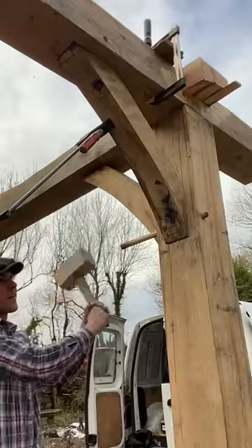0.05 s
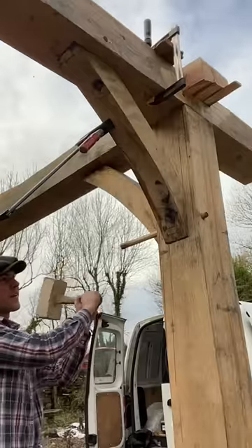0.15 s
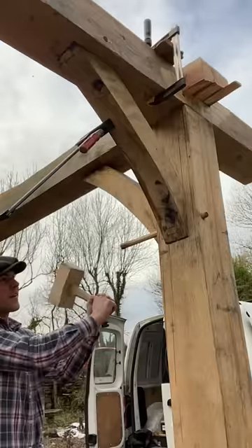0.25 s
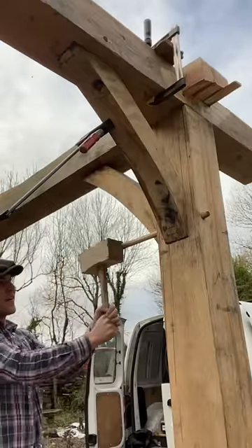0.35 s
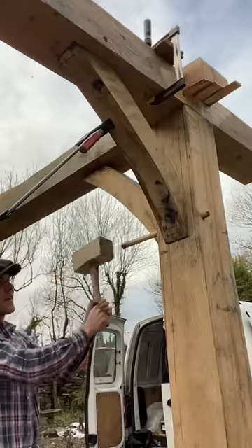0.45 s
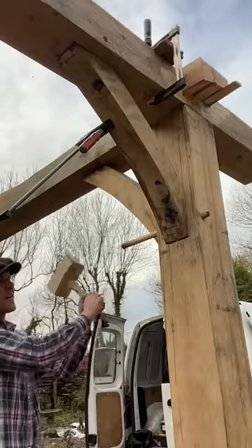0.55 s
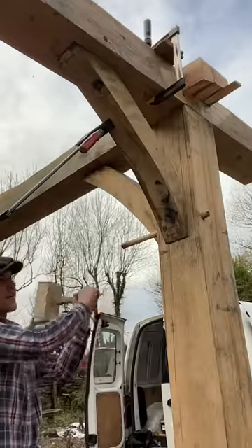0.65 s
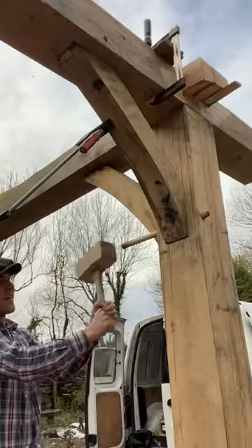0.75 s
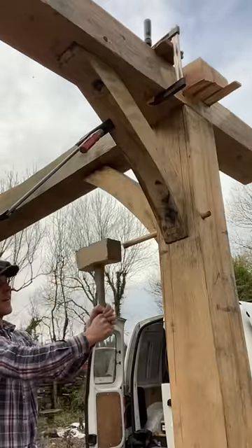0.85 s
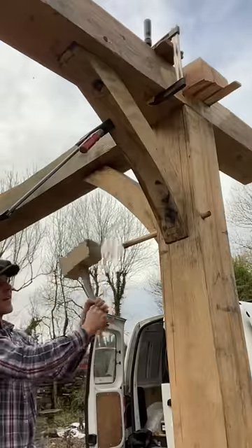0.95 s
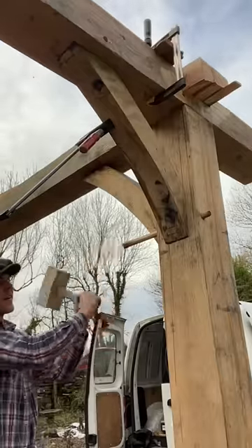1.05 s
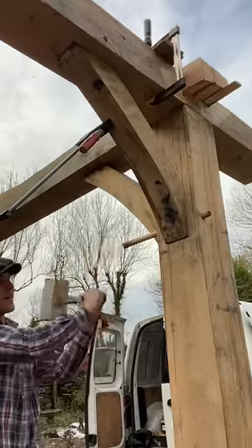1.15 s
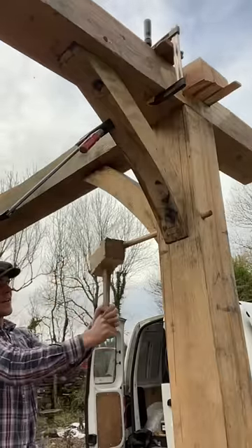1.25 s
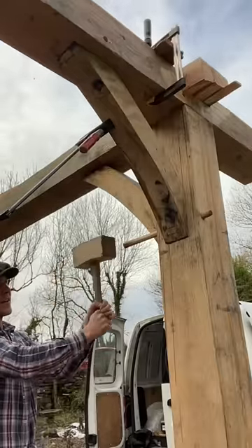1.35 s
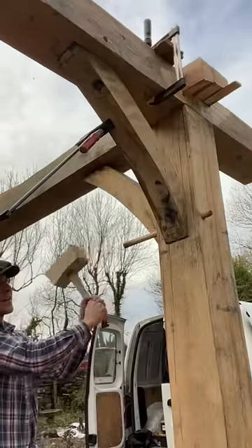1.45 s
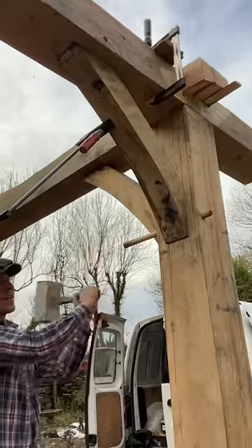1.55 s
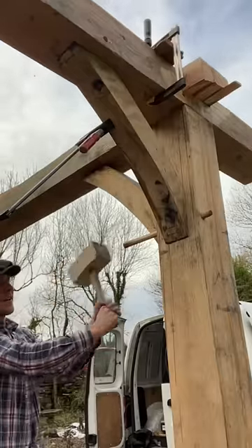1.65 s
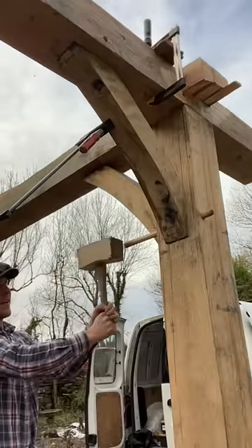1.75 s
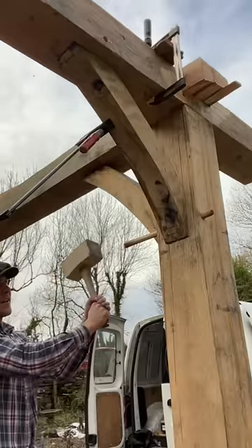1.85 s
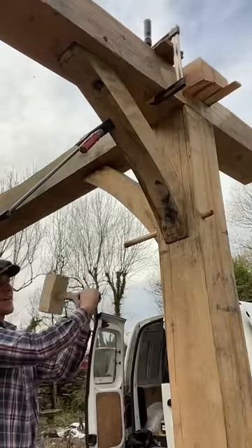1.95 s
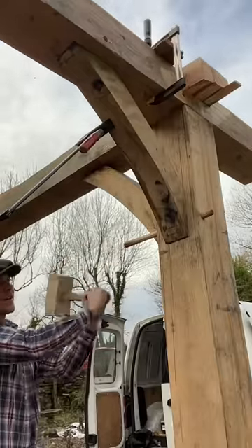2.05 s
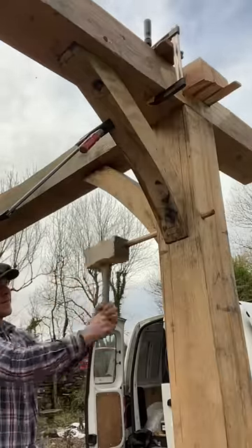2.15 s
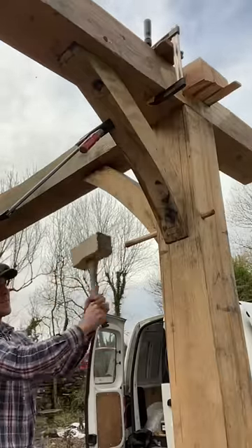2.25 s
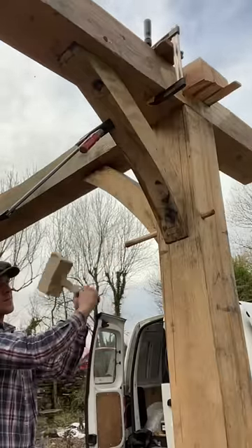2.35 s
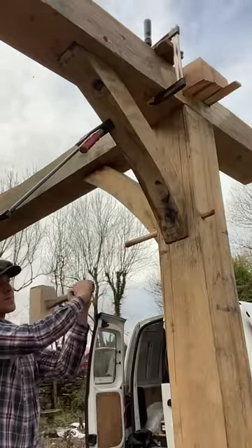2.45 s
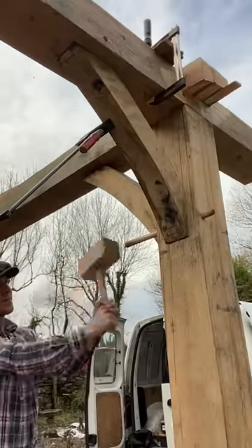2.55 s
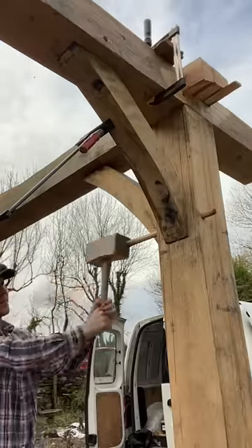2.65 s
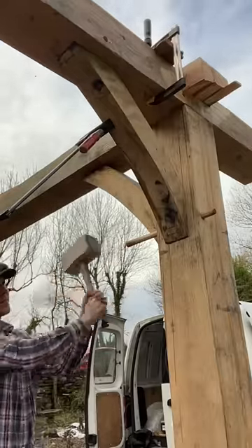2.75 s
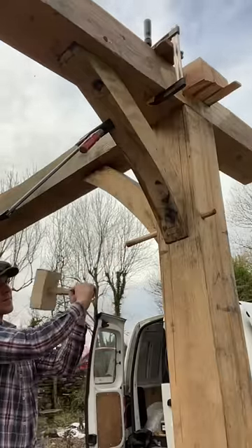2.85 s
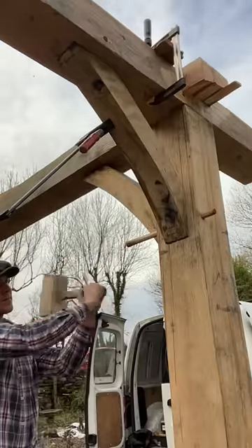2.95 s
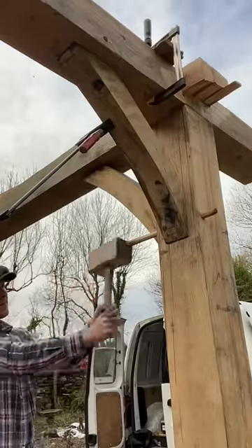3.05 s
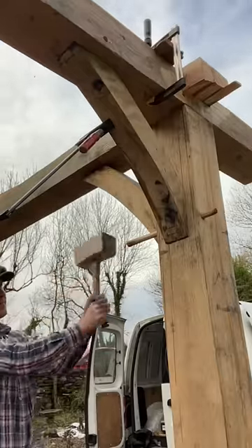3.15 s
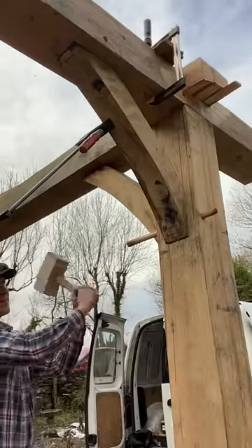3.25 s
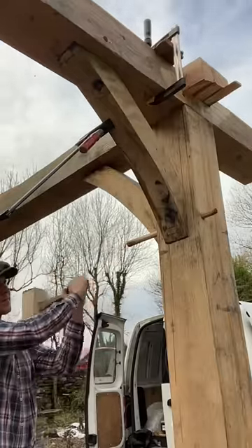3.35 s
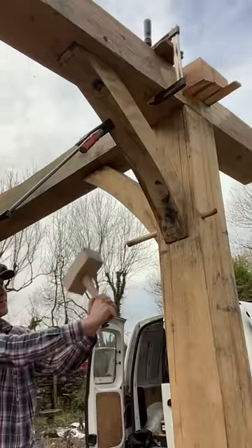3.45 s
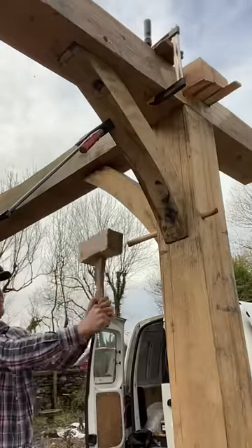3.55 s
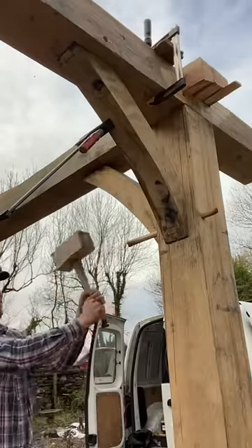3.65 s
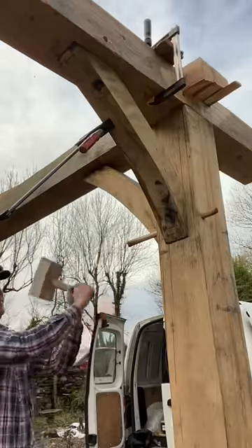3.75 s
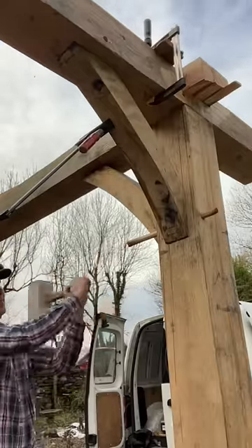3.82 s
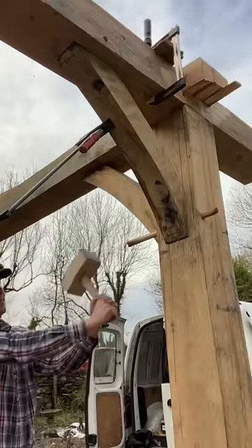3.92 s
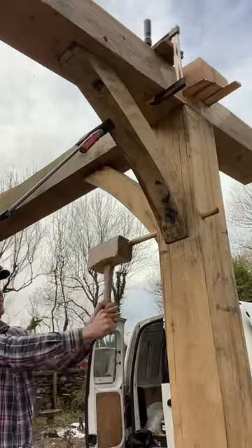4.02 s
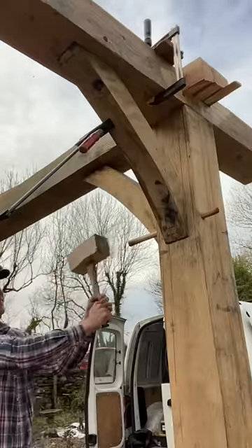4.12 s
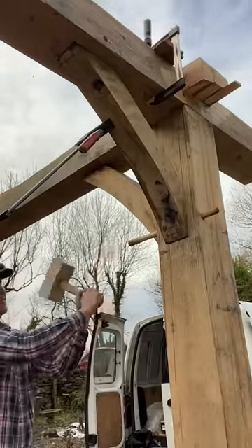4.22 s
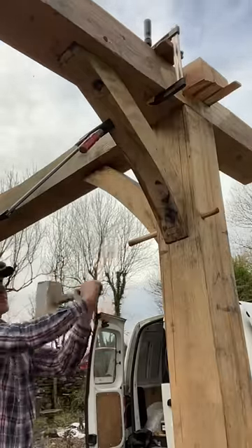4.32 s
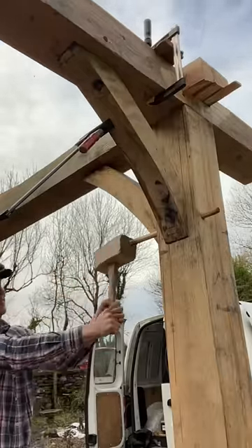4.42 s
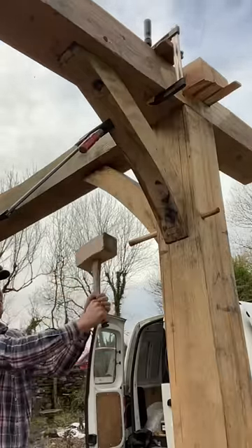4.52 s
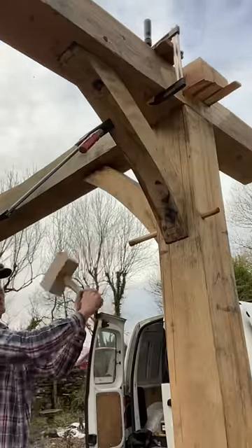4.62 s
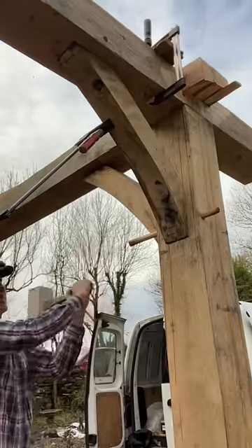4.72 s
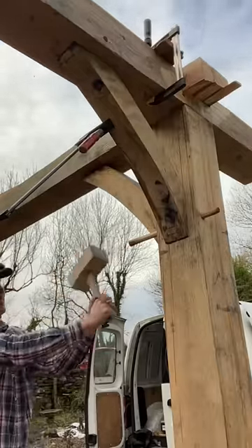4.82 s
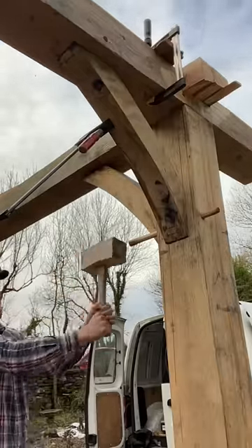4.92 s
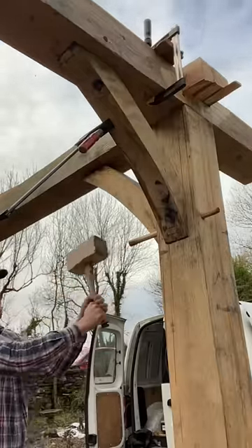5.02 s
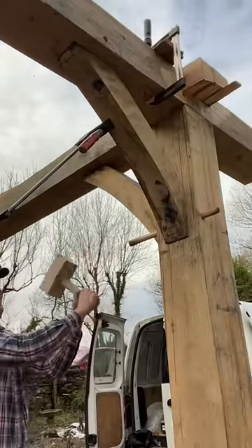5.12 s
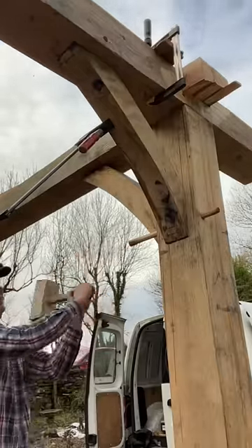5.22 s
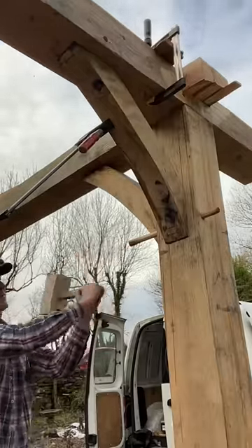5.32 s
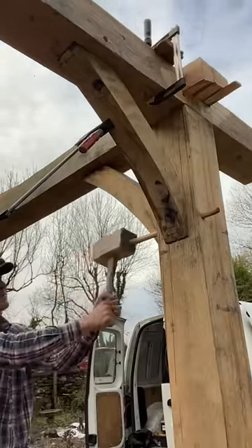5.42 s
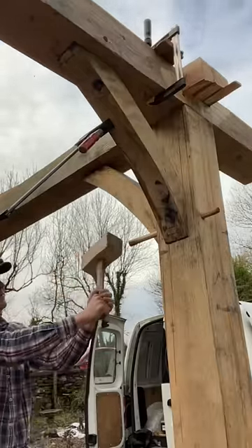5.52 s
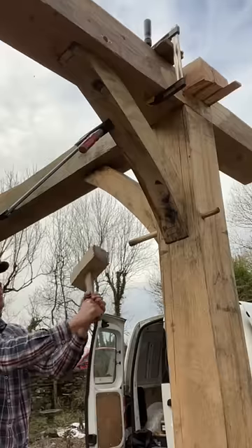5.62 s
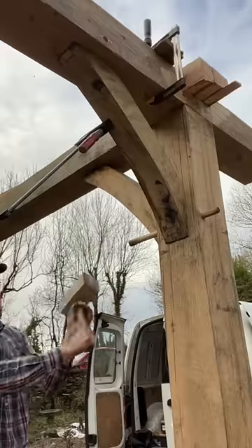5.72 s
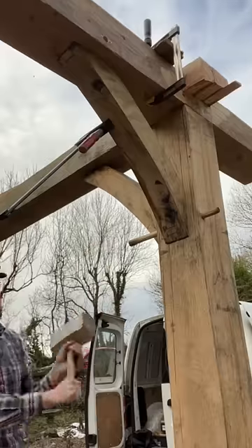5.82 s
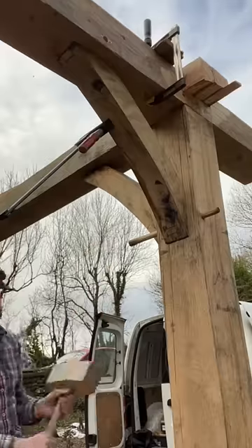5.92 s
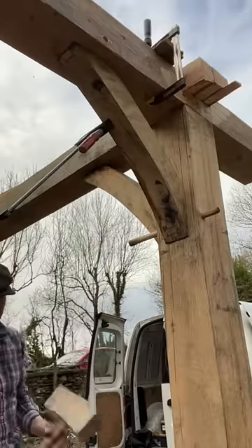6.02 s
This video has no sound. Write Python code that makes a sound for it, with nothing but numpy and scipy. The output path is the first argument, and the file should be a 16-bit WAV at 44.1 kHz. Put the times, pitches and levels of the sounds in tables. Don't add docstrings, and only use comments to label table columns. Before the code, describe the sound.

Mono, outdoors, close to the work: faint far traffic rumble and soft hiss underneath. At 0 s the tail of a mallet blow dies away. Twelve more follow at about 0.4, 0.85, 1.3, 1.75, 2.2, 2.65, 3.1, 3.55, 4.05, 4.5, 4.95 and 5.55 s. Each is a loud, hard, hollow wooden knock with a crisp fibrous crack, then dense slaps from ground and walls and a brief scattered tail. A low hum from the peg follows each blow, rising from roughly 220 to 335 Hz, and the timber shudders faintly. The blow near 5 s is duller; the last is softer, thuddy, with the post sounding, and tiny metallic clamp ticks at 5.6 s. Very faint sleeve rustles come at 1.7, 3.5, 4 and 4.9 s, clearest from 5.8 to the end. Distant bird chirps are high around 4.8-4.9 s, lower from 5.2 to 5.5 s.

```python
import sys
import numpy as np
from scipy import signal
from scipy.fft import rfft, irfft, next_fast_len
from scipy.io import wavfile
from scipy.ndimage import map_coordinates

SR = 44100
rng = np.random.default_rng(int(sys.argv[2]) if len(sys.argv) > 2 else 0)


def invert_db(x):
    u = np.asarray(x, float) / 20
    return 10 ** u


def log_audio(samples):
    frames = np.atleast_2d(samples).T
    limited = np.clip(frames, -1, 1)
    pcm = np.round(limited * 32767).astype(np.int16)
    wavfile.write(sys.argv[1], SR, pcm)


N = 268118
LEAD = SR // 5
SPAN = SR * 3 // 4
T = np.arange(SPAN) / SR

# (frequency [Hz], extra loss [dB/s])
AIR_LOSS = [(100, 15.5), (500, 39.5), (950, 24), (1800, 4), (4500, -4), (8000, 5.5), (11000, 44.5),
            (14000, 87.5)]


def unit(x):
    return x / np.sqrt(np.mean(x ** 2) + 1e-20)


def along(points, hz):
    f, v = np.transpose(points)
    return np.interp(np.log(hz + 1), np.log(f + 1), v)


def coloured(points, size):
    m = next_fast_len(size)
    gain = invert_db(along(points, np.fft.rfftfreq(m, 1 / SR)))
    return unit(irfft(rfft(rng.standard_normal(m)) * gain, m)[:size])


def dying(size, db_of, window):
    hz, t, z = signal.stft(rng.standard_normal(size), SR, nperseg=window)
    return signal.istft(z * invert_db(db_of(hz[:, None], t)), SR, nperseg=window)[1][:size]


def pulse(db_of):
    cepstrum = irfft(np.log(invert_db(db_of(np.fft.rfftfreq(4096, 1 / SR)))))
    cepstrum = cepstrum * np.r_[1, np.full(2047, 2), 1, np.zeros(2047)]
    return irfft(np.exp(rfft(cepstrum)))[:2048]


def ring(hz, db, t60_s, rise_s):
    return invert_db(db - 60 * T / t60_s) * (1 - np.exp(-T / rise_s)) * np.sin(2 * np.pi * hz * T)


def bumps(resonances, hz):
    return sum(db / (1 + (2 * (hz - centre) / width) ** 2) for centre, width, db in resonances)


def rustles(rows, t):
    return sum(invert_db(db) * np.exp(-((t - s) / length_s) ** 2) for s, db, length_s in rows)


def far_traffic():
    # (frequency [Hz], density [dB/Hz])
    spectrum = [(20, -44), (38, -17), (50, 1), (68, -12), (90, -4), (112, -24), (170, -32), (330, -41),
                (1500, -38), (4000, -44), (8000, -51), (12000, -62), (16500, -74)]
    swell = map_coordinates(rng.standard_normal(60), [np.arange(N) / SR * 8])
    return invert_db(-67 + 2 * swell) * coloured(spectrum, N)


def knock(db, colour_db, yard_db, dulling, seating):
    colour_hz = [150, 550, 1000, 1600, 2300, 3200, 5500, 11000]
    # (frequency [Hz], level [dB], t60 [s])
    head = [(535, 2, 0.08), (750, -2, 0.067), (982, -0.5, 0.023), (1340, -10.5, 0.0022), (1555, 0, 0.044),
            (1796, 7, 0.02), (2252, 7, 0.014), (2700, -12.5, 0.028), (2960, -13.5, 0.005),
            (3600, -3, 0.0016), (4350, -7.5, 0.026), (4300, -11, 0.017), (5670, -5, 0.043),
            (5980, -1, 0.012), (8150, -2.5, .006), (9410, 7.5, 0.008), (11600, -1, 0.0011),
            (12920, 6, 0.0016), (15300, 10, .004)]
    # (frequency [Hz], t60 [s])
    crack_t60 = [(2000, 0.026), (5000, 0.013), (10000, 0.006), (16000, 0.00098)]
    # (frequency [Hz], level [dB])
    radiated = [(40, -22), (120, -5), (250, 1.5), (400, -1.5), (650, -1.5), (1200, -6), (1900, 3.5),
                (2800, -7), (3500, -6.5), (5500, -6.5), (8000, -6.5), (11000, -12), (13000, -13),
                (15700, -8.5), (16100, -29.5)]
    # (centre [Hz], width [Hz], level [dB])
    tock = [(534, 23, 5), (734, 270, 12), (1587, 120, 14.5), (1820, 1500, 6), (2180, 320, -5),
            (4360, 94, -1.5), (9500, 1900, 11)]
    # (centre [Hz], width [Hz], level [dB])
    seated = [(1510, 100, 7.5), (1880, 200, -6), (2550, 160, 4), (3500, 500, -11), (4370, 500, 7.5)]

    colour = list(zip(colour_hz, colour_db))
    modes = 0
    for hz, level_db, t60_s in head:
        detune, luck = rng.standard_normal(2)
        mode = ring(hz * (1 + 0.011 * detune), level_db + along(colour, hz), t60_s, rise_s=.0002)
        modes = modes + np.sign(luck) * mode

    def crack_db(hz, t):
        return along(colour, hz) - 40 * (hz < 1200) - 60 * t / along(crack_t60, hz)

    crack = dying(2048, crack_db, window=32)
    crack = np.pad(crack, (0, SPAN - len(crack))) * (1 - np.exp(-(T / .0003) ** 2))

    crisp = np.clip(1 - .5 * dulling, 0, 1)

    def click_db(hz):
        tock_db = bumps(tock[:1], hz) + crisp * bumps(tock[1:], hz)
        tock_db = tock_db + (0.27 + crisp) * seating * bumps(seated, hz)
        return along(colour, hz) + along(radiated, hz) + tock_db - dulling * np.log2(1 + hz / 1000)

    click = pulse(click_db)
    small_head = signal.butter(2, 330, 'high', fs=SR, output='sos')
    direct = signal.sosfilt(small_head, modes + invert_db(13) * crack)
    return invert_db(db - 7.5) * direct, invert_db(db + yard_db + 9.5) * click


def timber(peg_hz, peg_db, brace_db, beam_db, thud_db):
    # (frequency [Hz], density [dB/Hz])
    footings = [(30, -18.5), (60, -8), (90, -1), (120, 1.5), (150, -14), (200, -45)]

    def swell(at_s, width_s):
        return np.exp(-((T - at_s) / width_s) ** 2)

    peg = ring(peg_hz, peg_db, min(.62, .62 * (305 / peg_hz) ** 5), .025)
    brace = ring(207, brace_db, .6, .025)
    beam_swell = .8 * swell(.018, .012) + swell(.059, .014)
    beam = invert_db(beam_db) * beam_swell * np.sin(2 * np.pi * 210 * T)
    thud = invert_db(thud_db) * swell(.019, .007) * np.cos(2 * np.pi * 65 * (T - .019))
    shudder = invert_db(-45 - 60 * T / .5) * (1 - np.exp(-T / 0.022)) * coloured(footings, SPAN)
    return peg + brace + beam + thud + shudder


def walls():
    # (delay [s], level [dB], extra bass [dB], extra treble [dB], spread [s])
    surfaces = [(.008, -0.5, -17.5, -12, 0.0035), (0.0159, 7.5, -7.5, -7.5, .003),
                (0.018, 1.5, -3, -5.5, 0.0038), (0.026, -1, 2, -5.5, 0.0018),
                (0.026, 12.5, -6, -12.5, 0.0037), (0.033, -3, 0.5, -3, .003), (0.039, -4, -3.5, -0.5, .004),
                (.046, -5, -1, -9, 0.0018), (.053, -2, -3, -4.5, 0.0054), (0.104, -25, -11, -9.5, 0.0018),
                (0.145, -8.5, -6.5, -11.5, 0.0054)]
    size = 8192
    hz, total = np.fft.rfftfreq(size, 1 / SR), 0
    for delay_s, db, bass_db, treble_db, spread_s in surfaces:
        smear = rng.standard_normal(size) * np.exp(-np.abs(T[:size] - delay_s) / spread_s * 3)
        loss_db = -delay_s * along(AIR_LOSS, hz) * (hz > 8000)
        tilt_db = along([(500, bass_db), (1500, 0.0086), (3000, 0), (8000, treble_db)], hz)
        total = total + rfft(smear / np.linalg.norm(smear)) * invert_db(db + loss_db + tilt_db)
    return np.pad(irfft(total, size), (0, SPAN - size))


def scatter():
    # (frequency [Hz], level [dB])
    spectrum = [(60, 16), (200, 13.5), (600, 8.5), (1800, 1.5), (6000, -2), (11000, -3.5), (16000, -7.5)]
    tail = dying(SPAN, lambda hz, t: along(spectrum, hz) - t * along(AIR_LOSS, hz), window=140)

    def crowd(db, build_s, fall_db_per_s):
        return invert_db(db - fall_db_per_s * T) * (1 - np.exp(-(T / build_s) ** 2))

    sheds = crowd(7, 0.02, 297)
    trees = crowd(1, 0.11, 143)
    hill = crowd(-32.5, 0.11, 59.5)
    return tail * invert_db(-16.5) * np.hypot(sheds, trees + hill)


def mallet():
    # (time [s], knock level [dB], peg bending pitch [Hz], peg ring level [dB], softness [0-1])
    blows = [(-0.055, -13.5, 217.5, -48.5, 0.03), (0.3864, -10, 231, -51.5, 0.03),
             (0.8535, -11, 242, -52, 0.01), (1.312, -9.5, 253, -45.5, 0.01),
             (1.7587, -8.5, 268.7, -44.5, 0.01), (2.2013, -10, 280, -41, 0), (2.6512, -10, 295, -43.5, 0),
             (3.105, -10, 310.7, -40, 0), (3.566, -10, 328.6, -39.5, 0.05), (4.0348, -9, 330, -39, 0.04),
             (4.4989, -8.5, 331.5, -46.5, 0.07), (4.9633, -7.5, 333, -45, 0.47),
             (5.5343, -14, 336.6, -33.5, 0.94)]
    clean_db = [-15.5, -14, -7, -5, -3, -2.5, -4.5, -9]
    seated_db = [3, 0.5, 4.5, 0, 3, 2.5, 3, 2]
    soft_db = [9.5, 22.5, 8, 4, -2.5, -0.5, -4, -6.5]
    glance_db = [0, 0, 0, -5, -4, 3, -5, 0]
    jolts = {0: (24, 0, -1), 1: (22, -8, -1), 2: (34, -10, 2), 5: (-8, 0, 14)}
    # (delay [s], level [dB])
    mirrors = [
        (0.0141, -9),
        (0.0263, -8.5),
    ]
    mirror_band = signal.butter(2, [1300, 2200], 'band', fs=SR, output='sos')
    seat_start_hz, seat_end_hz = 290, 330

    out = np.zeros(N + LEAD + 2 * SPAN)
    still = walls() + scatter()
    for k, (s, db, peg_hz, peg_db, soft) in enumerate(blows):
        soft = np.clip(soft, 0, 1)
        seating = np.clip((peg_hz - seat_start_hz) / (seat_end_hz - seat_start_hz), 0, 1)
        colour_db = np.array(clean_db) + seating * np.array(seated_db) + soft * np.array(soft_db)
        colour_db = colour_db + min(1, 6.0 * soft) * np.array(glance_db)
        dulling = 0.88 + 1.9 * np.sqrt(soft)
        direct, click = knock(db, colour_db, -3.5 * soft ** 2, dulling, seating)

        copies = sum(invert_db(copy_db) * np.roll(direct, round(delay_s * SR)) for delay_s, copy_db in mirrors)
        direct = direct + (1 - soft ** .5) * signal.sosfilt(mirror_band, copies)

        yard = .8 * still + .6 * (walls() + scatter())
        yard = yard * invert_db(-12 * dulling * T)

        brace_beam_thud_db = np.add([-72, -39, -38.5], jolts.get(k, 0))
        frame = timber(peg_hz, peg_db, *brace_beam_thud_db)
        post = soft ** 2 * ring(375, db - 5.5, .11, 0.0018)
        blow = direct + signal.fftconvolve(click, yard)[:SPAN] + frame + post
        out[LEAD + round(s * SR):][:SPAN] += blow
    return out[LEAD:][:N]


def sleeve():
    # (time [s], level [dB], length [s])
    crisp = [
        (1.67, -87, .025),
        (3.46, -84, 0.038),
        (5.835, -81.5, .045),
        (5.931, -85.5, 0.015),
    ]
    # (frequency [Hz], density [dB/Hz])
    crisp_spectrum = [(1500, -30), (3000, -6), (6000, -3), (9000, 0), (12500, -6), (14500, 0), (15800, -3),
                      (16300, -40)]
    # (time [s], level [dB], length [s])
    folds = [
        (3.98, -81, 0.049),
        (4.86, -86, 0.064),
        (5.9, -83.5, 0.033),
        (6.05, -81, 0.089),
    ]
    # (frequency [Hz], density [dB/Hz])
    fold_spectrum = [(500, -30.5), (1300, -5), (2600, 0), (4000, -8), (8000, -16), (12000, -29.5)]
    t = np.arange(N) / SR
    grain = invert_db(2 * map_coordinates(rng.standard_normal(1000), [t * 150]))
    cloth = rustles(crisp, t) * coloured(crisp_spectrum, N)
    cloth = cloth + (invert_db(-100) + rustles(folds, t)) * coloured(fold_spectrum, N)
    return grain * cloth


def bird():
    # (time [s], pitch [Hz], length [s], level [dB])
    chirps = [
        (4.805, 7800, .035, -84),
        (4.91, 7600, .045, -84),
        (5.225, 4100, .04, -83),
        (5.265, 3900, .05, -80),
        (5.33, 4150, .05, -79),
        (5.41, 4000, .06, -83),
        (5.485, 3900, .035, -83),
    ]
    out = np.zeros(N + SPAN)
    for s, hz, length_s, db in chirps:
        where = [[np.zeros(SPAN), np.ones(SPAN)], [T * 400] * 2]
        phase_flutter, level_flutter = map_coordinates(rng.standard_normal((2, 400)), where)
        phase = 2 * np.pi * hz * T * (1.03 - .03 * T / length_s) + 1.2 * phase_flutter
        envelope = np.sin(np.pi * np.clip(T / length_s, 0, 1))
        out[round(s * SR):][:SPAN] += invert_db(db + 4 * level_flutter) * envelope * np.sin(phase)
    return out[:N]


def clamp():
    # (time [s], level [dB])
    ticks = [
        (5.587, -65),
        (5.601, -61),
        (5.616, -63),
        (5.63, -69),
    ]
    out = np.zeros(N + SPAN)
    for s, db in ticks:
        tick = ring(9550, db, .025, .002) + ring(6000, db + 7, .008, .0003) + ring(3800, db + 2, .006, .0003)
        out[round(s * SR):][:SPAN] += tick
    return out[:N]


def scene():
    return (far_traffic() + mallet() + sleeve() + bird() + clamp())[None]


def band_limit(x):
    return signal.sosfilt(signal.butter(12, 17170, fs=SR, output="sos"), x)


def record(dry):
    low_hz, top_hz = 29.6, 16300
    dry = dry / (1 + np.abs(dry / .75) ** 4) ** (1 / 4)
    dry = signal.sosfilt(signal.butter(2, low_hz, 'high', fs=SR, output='sos'), dry)
    m = next_fast_len(N + 4096)
    lowpass = 1 / (1 + (np.fft.rfftfreq(m, 1 / SR) / top_hz) ** 60)
    mix = irfft(rfft(dry, m) * lowpass, m)[:, :N]
    return band_limit(mix)


dry = scene()
out = record(dry)
log_audio(out)
```